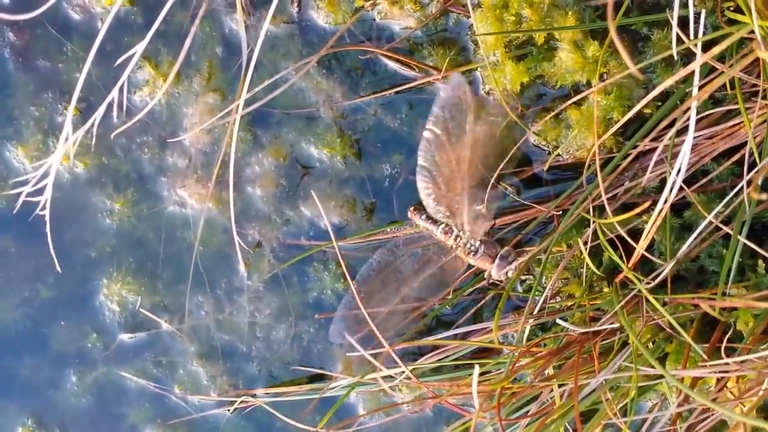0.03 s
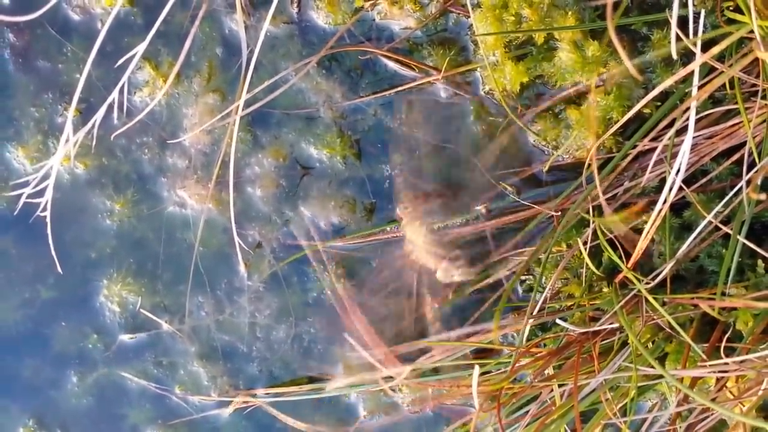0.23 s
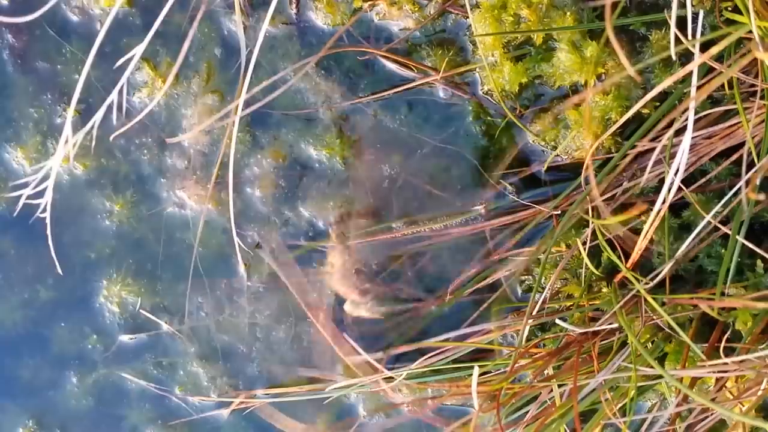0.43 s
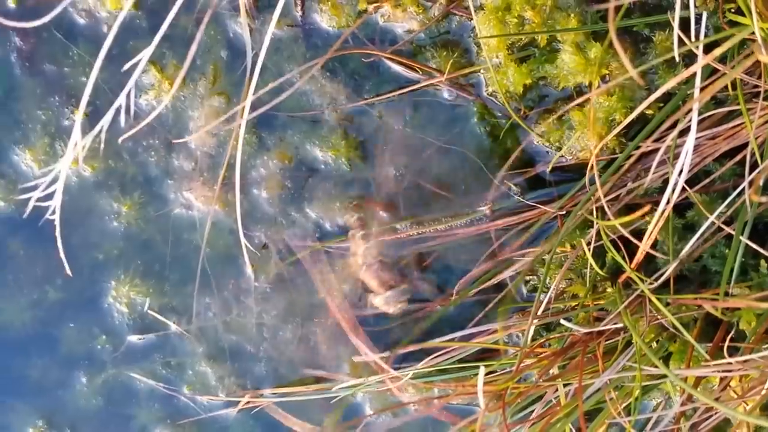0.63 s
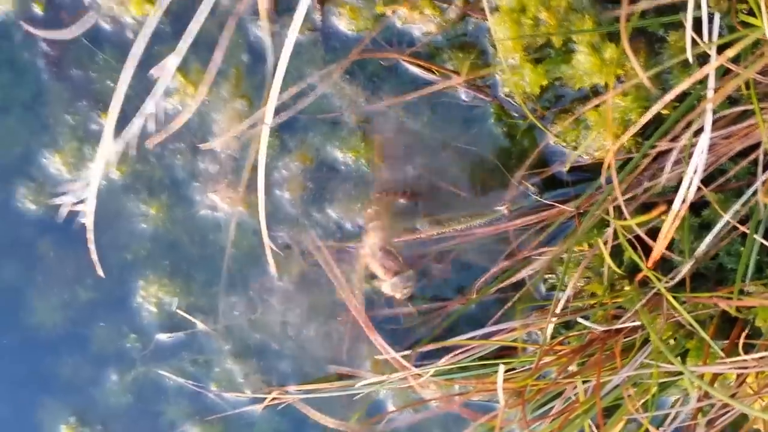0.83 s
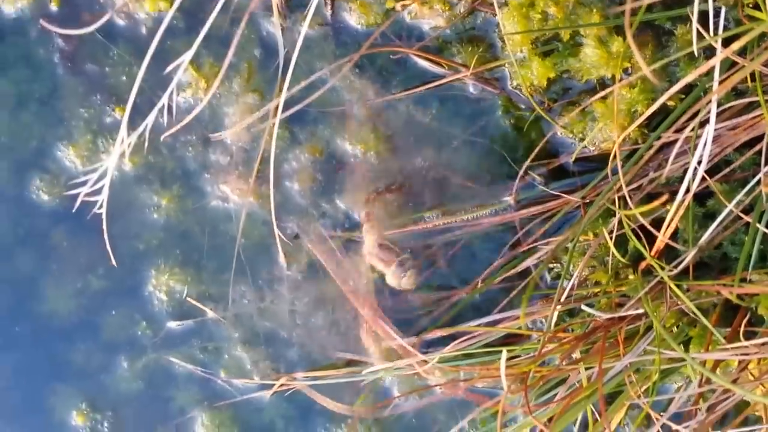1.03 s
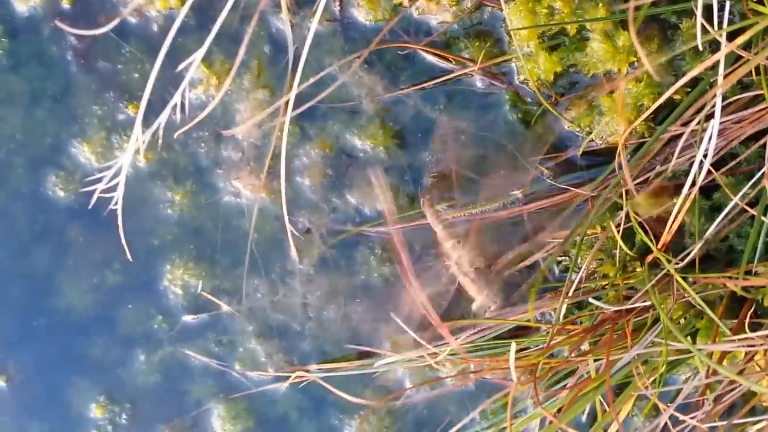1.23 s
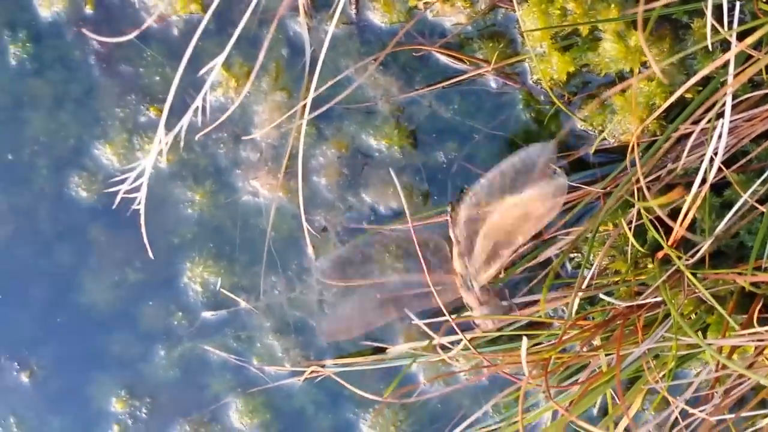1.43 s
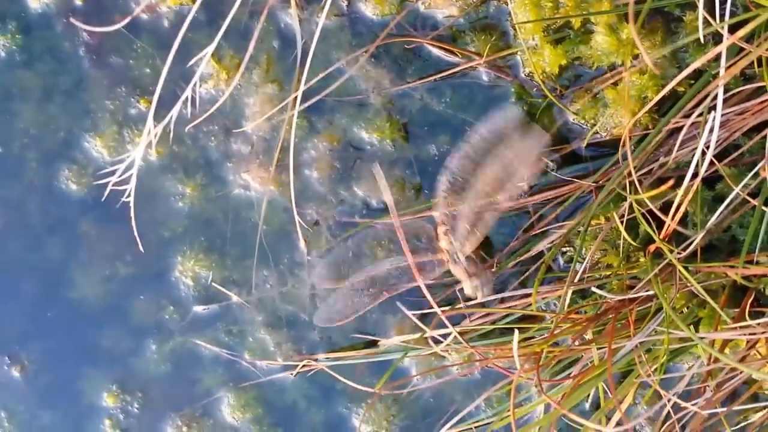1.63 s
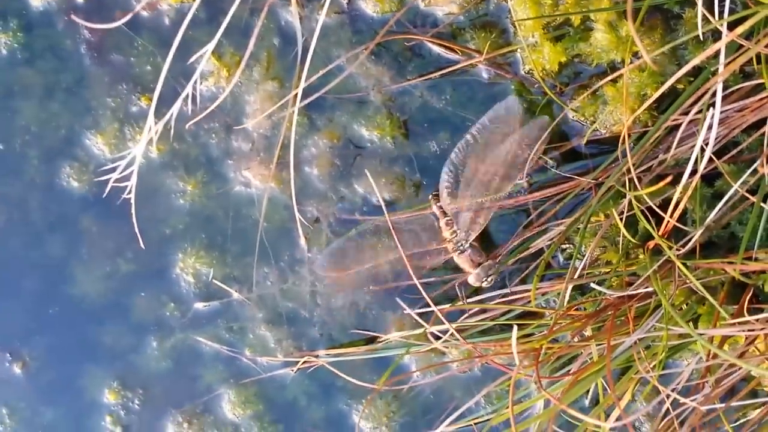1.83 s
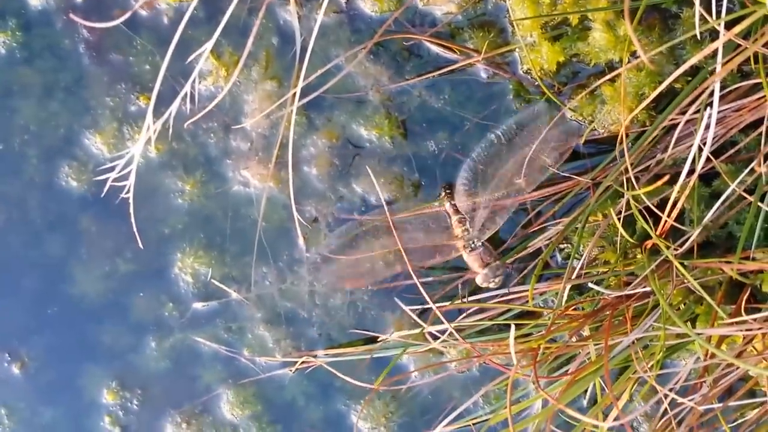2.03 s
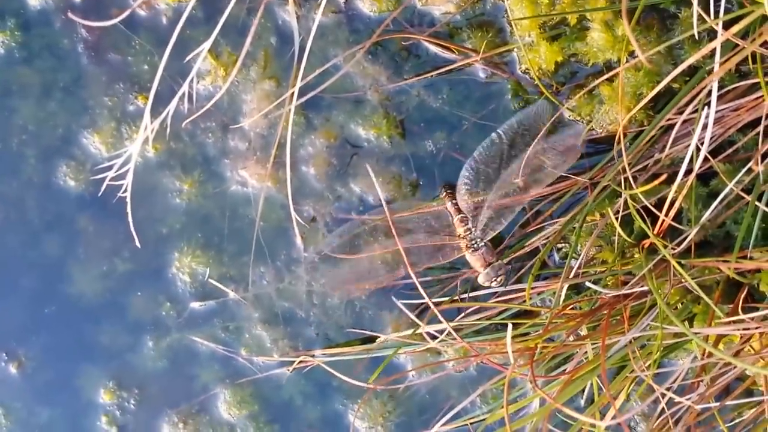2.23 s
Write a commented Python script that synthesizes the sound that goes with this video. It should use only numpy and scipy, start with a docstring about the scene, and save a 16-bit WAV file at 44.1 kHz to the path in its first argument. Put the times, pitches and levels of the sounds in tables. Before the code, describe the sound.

A dragonfly beats its wings against dry grass very close by, a rapid crinkle with sharp snaps over a faint low hum. It then settles, its legs ticking on the stalks in quiet air beside a pond.

```python
"""A soft low bump and a thin scrape, then a dragonfly beats its wings on dry grass by a pond, very close.
Each stroke brushes the stems in a crinkle of tiny clicks; the hardest strokes slap and snap.
Underneath, the air pushed by the wings makes a low hum and a soft rush.
Then it settles: its legs tick on the stalks and the grass rustles faintly in the quiet open air."""
import sys
import numpy as np
from scipy import signal
from scipy.fft import rfft, irfft, next_fast_len
from scipy.io import wavfile

SR = 44100
rng = np.random.default_rng(int(sys.argv[2]) if len(sys.argv) > 2 else 0)


def unload_audio(sound):
    """Save the sound as a 16-bit wav file, at the path given as the first command line argument."""
    columns = np.transpose(np.atleast_2d(sound))
    # keep every value between -1 and 1, then stretch to whole-number steps
    steps = np.round(np.clip(columns, -1, 1) * 32767)
    wavfile.write(sys.argv[1], SR, steps.astype(np.int16))


N = 105840
TIME = np.arange(N) / SR

# how fast the wings beat: t/s, f/Hz
WINGBEAT_RATE = [(0.3, 33.6), (0.48, 33.2), (0.56, 32.0), (0.68, 34.8), (0.85, 34.4), (0.97, 33.0),
                 (1.1, 33.6), (1.22, 32.4), (1.4, 33.4)]
# how hard the wings brush the grass: t/s, level/dB
BRUSH_LEVEL = [(0.11,-71),(0.14,-63.5),(0.2,-59.5),(0.236,-45.5),(0.25,-36.5),(0.318,-30.5),(0.384,-39.5),(0.405,-32),(0.414,-46),(0.425,-30.5),(0.57,-35.5),(0.73,-35.5),(0.84,-31.5),(0.95,-35.5),(1.08,-35.5),(1.2,-35),(1.328,-35),(1.341,-38.5),(1.352,-34.5),(1.395,-40.5),(1.428,-35.5),(1.47,-51),(1.53,-63),(1.66,-74)]
# tone of dry grass at each ear (how strong each frequency is): f/Hz, level/dB
GRASS_TONE_LEFT = [(40,-28),(110,-12),(450,-16.5),(1050,-11),(1400,-2.5),(1800,-2),(2600,-16),(3500,-8),(5600,-2.5),(6000,-9.5),(6650,1),(7400,-5.5),(8100,-2.5),(8500,-12),(8900,-26),(9400,-13),(10400,-7.5),(11600,-20),(14500,-18)]
GRASS_TONE_RIGHT = [(40,-11),(110,-15.5),(450,-29),(700,-23),(1150,-11),(1750,-11),(2900,-9),(4000,-9),(5500,-7),(8000,0),(9500,-0.5),(10400,-3.5),(11700,-2.5),(14500,-6)]
# borders between the crinkle's frequency bands: f/Hz
CRINKLE_EDGES = [1100, 1550, 2300, 3300, 4600, 6200, 8000, 10500]
# wing slaps on the stems: t/s, body level/dB, treble level/dB
WING_SLAPS = [(0.2137,-48,-36),(0.241,-43,-28.5),(.249,-39.5,-28),(0.269,-38,-23.5),(.2735,-30.5,-26),(0.2814,-50,-27),(0.2966,-32,-21),(0.3005,-32,-28),(0.3092,-54,-28),(0.3142,-36,-31),(0.3284,-30,-31),(.332,-49,-31),(0.344,-33,-22.5),(0.3466,-42,-30),(.3577,-29,-20.5),(.3717,-40,-25),(0.375,-33,-32),(0.3894,-32.5,-24),(0.3942,-33.5,-22),(.405,-32.5,-27),(0.419,-36.5,-25.5),(0.4236,-35,-24.5),(0.448,-37,-27),(0.4542,-34,-26),(0.4783,-37.5,-29),(.508,-29.5,-27.5),(0.539,-37.5,-32.5),(.602,-40,-33.5),(0.66,-45,-34),(0.688,-28,-24),(0.7179,-33,-25.5),(0.7478,-38.5,-24),(0.7751,-34.5,-25.5),(0.8039,-31,-22),(0.8326,-28.5,-23.5),(.862,-27,-22.5),(0.8928,-32.5,-24.5),(1.0752,-39,-33.5),(1.101,-35.5,-32),(1.1065,-31.5,-27),(1.1278,-35,-26.5),(1.1374,-36,-36),(1.1774,-47,-31.5),(1.1954,-33,-27.5),(1.229,-27.5,-32),(1.256,-30.5,-23.5),(1.261,-32,-33),(1.2874,-24,-21),(1.2921,-35.5,-29),(1.312,-32.5,-27),(1.319,-31,-27),(1.3705,-37.5,-26.5),(1.3798,-38.5,-25),(1.408,-42,-25.5)]
# snaps of the wing's thin skin: t/s, level/dB, f/Hz
WING_SNAPS = [(.274,-11,8600),(.314,-10.5,7540),(.359,-10.5,11600),(.425,-13,8040),(.717,-15,9400),(.7497,-8,9200),(0.7746,-13.5,9000),(.834,-15.5,8800),(1.130,-21.5,10500),(1.179,-16,11900),(1.289,-16.5,11500)]
# wing hum: t/s, level/dB
HUM_LEVEL = [(0.15,-83),(0.22,-70),(0.38,-69.5),(0.52,-56.5),(0.85,-60),(1.0,-63),(1.28,-62.5),(1.44,-67.5),(1.52,-81.5),(1.64,-76),(1.72,-84.5)]
# notes in the hum: multiple of the wingbeat, level/dB
HUM_NOTES = [(2,2.5),(3,-0.5),(4,-1.5),(5,-8.5),(6,-12)]
# rush of churned air: t/s, level/dB
RUSH_LEVEL = [(0.09,-90),(0.13,-68),(0.22,-69.5),(0.3,-73),(0.6,-51),(0.8,-59.5),(1.1,-53.5),(1.35,-57.5),(1.47,-62),(1.62,-65.5),(1.75,-75),(1.9,-70.5),(2.12,-91.5)]
# its tone: f/Hz, level/dB
RUSH_TONE = [(25,-6),(70,-8),(180,-4),(400,-7),(700,-12.5),(1200,-14.5),(4000,-42.5)]
# a wing edge scraping: t/s, level/dB
SCRAPE_LEVEL = [(0.11,-83.5),(0.135,-54.5),(0.155,-84),(0.18,-45),(0.2,-86),(0.225,-66),(0.26,-90)]
# its tone: f/Hz, level/dB
SCRAPE_TONE = [(2000,-35.5),(7500,-8.5),(9000,-7),(9500,9),(10300,-13),(14500,-34)]
# legs tapping stalks: t/s, left level/dB, right level/dB, blade ring level/dB
LEG_TICKS = [(.133,-50,-54,-63),(0.168,-54,-49,-70),(1.472,-39,-60,-48),(1.511,-46,-48,-55),(1.5417,-58,-52,-39),(1.565,-50,-62,-48),(1.5763,-48.5,-50,-37),(1.5838,-40,-52.5,-39),(1.5929,-52,-62,-37),(1.6046,-54,-64,-41),(1.620,-43,-61,-64),(1.686,-55,-49,-58),(1.751,-50,-47.5,-58),(1.7797,-43,-65,-46),(1.9666,-51,-64,-52),(1.9758,-48.5,-61,-46),(2.005,-60,-68,-45.5),(2.0209,-46.5,-65,-49),(2.238,-50,-69,-52.5),(2.249,-44.5,-63,-50),(2.2819,-51,-68,-45.5)]
# tone of the stalks at the left ear: f/Hz, level/dB
STALK_TONE = [(150,-5.5),(900,-12.5),(1250,-12),(1750,-2.5),(2400,-9),(3400,-3),(4500,-5),(6400,-2),(7000,-7.5),(7700,-22),(10500,-18.5),(14500,-24)]
# faint grass rustles: middle t/s, half length/s, left level/dB, right level/dB
GRASS_RUSTLES = [(1.466,0.026,-49,-72),(1.576,0.043,-54.5,-62.5),(1.69,0.012,-63.5,-59),(1.831,0.032,-59.5,-64.5),(1.998,0.068,-62,-78.5),(2.071,0.011,-74,-57),(2.273,0.047,-64.5,-78)]
# tone of the low bump: f/Hz, level/dB
BUMP_TONE = [(40,-14),(200,5),(700,-6),(1500,-31),(5000,-52)]
# tone of the open air: f/Hz, level/dB
AIR_TONE = [(25,-11.5),(100,-4.5),(267,-6),(430,-9),(697,-15.5),(1070,-13.5),(1720,-15),(2570,-19),(6520,-17.5),(9000,-16.5),(14500,-23.5)]

BODY_EDGE_HZ, CUTOFF_HZ = 4600, 14650   # top of the crinkle's body; top of the whole sound
BODY_SHARED, TREBLE_SHARED = 0.5, 0.056   # share of the power common to both ears
CLUMP_HZ, PATCH_HZ, WAVER_HZ = 176, 25.6, 9   # how fast clicks clump, bands flicker and the hum wavers
RUSTLE_CLICKS_PER_S, RUSTLE_SPREAD_DB = 2500, 4


def brushing(phase):
    """Wings brush the grass: the crinkle swells as each stroke lands and thins as they lift off."""
    level_db = curve(BRUSH_LEVEL) + 1.1 * drift(CLUMP_HZ)
    body = amp(level_db - 1.5 + 2 * np.cos(phase))
    treble = amp(level_db - 3 + 1.16 * np.cos(phase))
    return crinkle(body, treble, per_s=5000, spread_db=5, flicker_db=3.22)


def wing_phase(landing_s=0.693):
    """Angle of the wingbeat: one turn per stroke, zero for the stroke that lands at landing_s."""
    turns = np.cumsum(curve(WINGBEAT_RATE)) / SR
    return 2 * np.pi * (turns - np.interp(landing_s, TIME, turns))


def crinkle(body, treble, per_s, spread_db, flicker_db):
    """Stems give the lower body, the wing's skin the treble; the tone shifts from touch to touch."""
    stems = body * crackle(per_s, spread_db, BODY_SHARED)
    skin = treble * crackle(per_s, spread_db, TREBLE_SHARED)
    out = 0
    for low, high in zip([20] + CRINKLE_EDGES, CRINKLE_EDGES + [18000]):
        band = signal.butter(2, [low, high], "band", fs=SR, output="sos")
        source = stems if high <= BODY_EDGE_HZ else skin
        flicker = amp(flicker_db * drift(PATCH_HZ))
        out = signal.sosfilt(band, source + 1e-18) * flicker - out   # flipping signs joins the bands
    return colour(out, GRASS_TONE_LEFT, GRASS_TONE_RIGHT)


def slaps():
    """A wing hits a stem squarely and makes a short, dense burst of clicks."""
    starts, body_db, treble_db = np.transpose(WING_SLAPS)
    shapes = np.array([burst(t, attack_s=0.00049, hold_s=0.00097, decay_s=0.0023) for t in starts])
    body = amp(body_db + 7.5) @ shapes
    treble = amp(treble_db - 0.12) @ shapes
    return crinkle(body, treble, per_s=8000, spread_db=1.5, flicker_db=1.9)


def snaps(width_s=0.00044, left_db=-23):
    """The wing's skin buckles and rings for a few cycles, off to the right."""
    out = 0
    for t, db, hz in WING_SNAPS:
        age = TIME - t
        out += amp(db) * np.exp(-(age / width_s) ** 2) * np.sin(2 * np.pi * hz * age)
    return np.array([amp(left_db) * out, out])


def hum(phase, waver_rad=0.35, waver_db=1.5):
    """The wings push the air, making low, wavering notes at multiples of the beat."""
    out = 0
    for multiple, db in HUM_NOTES:
        offset = rng.uniform(0, 2 * np.pi) + waver_rad * np.array([drift(WAVER_HZ), drift(WAVER_HZ)])
        out += amp(db + waver_db * drift(WAVER_HZ)) * np.sin(multiple * phase + offset)
    return amp(curve(HUM_LEVEL)) * out


def rush():
    """Air churned by the wings makes a soft, low noise."""
    noise = two_ears(rng.standard_normal((3, N)), shared=0.3)
    return amp(curve(RUSH_LEVEL)) * colour(noise, RUSH_TONE)


def scrape(left_db=-13):
    """A wing edge slides along a blade of grass before the flutter starts."""
    clicks = amp(curve(SCRAPE_LEVEL)) * crackle(RUSTLE_CLICKS_PER_S, RUSTLE_SPREAD_DB, TREBLE_SHARED)
    return amp([[left_db], [0]]) * colour(clicks, SCRAPE_TONE)


def blade_rings(pitch_hz=6230, decay_s=0.00067):
    """Each leg tick sets a blade ringing briefly, at a slightly different pitch."""
    out = 0
    for t, _, _, db in LEG_TICKS:
        hz = pitch_hz * (1 + 0.044 * rng.standard_normal())
        out += amp(db + 4) * burst(t, decay_s / 2, decay_s) * np.sin(2 * np.pi * hz * (TIME - t))
    return out


def leg_ticks(decay_s=0.0012):
    """Legs tap the stalks, each tap a tiny burst of noise."""
    taps = sum(amp([[left], [right]]) * burst(t, decay_s / 10, decay_s)
               for t, left, right, _ in LEG_TICKS)
    return amp(2.5) * taps * rng.standard_normal((2, N))


def rustles(clump_db=3.5):
    """The grass stirs in faint swells of clumped clicks."""
    swells = sum(amp([[left], [right]]) * np.exp(-((TIME - t) / half) ** 2 / 2)
                 for t, half, left, right in GRASS_RUSTLES)
    clumps = amp(clump_db * drift(CLUMP_HZ))
    return swells * clumps * crackle(RUSTLE_CLICKS_PER_S, RUSTLE_SPREAD_DB, TREBLE_SHARED)


def settling():
    """The dragonfly settles: ticks and rustles take on the grass's tone; blades ring on the left."""
    rings = blade_rings()
    clicks = rustles() + leg_ticks()
    left = colour(clicks[:1], STALK_TONE) + rings
    right = colour(clicks[1:], GRASS_TONE_RIGHT)
    return np.vstack([left, right])


def bump(start_s=0.031):
    """One soft, low bump before the flutter."""
    knock = burst(start_s, attack_s=0.00039, decay_s=0.0039) * rng.standard_normal((1, N))
    return amp(-53) * colour(knock, BUMP_TONE)


def open_air():
    """The steady, quiet hiss of the outdoors."""
    noise = two_ears(rng.standard_normal((3, N)), shared=0.43)
    return amp(-69) * colour(noise, AIR_TONE)


def amp(db):
    """Turn decibels into a number to multiply by."""
    return 10 ** (np.asarray(db) / 20)


def unit_power(x):
    """Scale a signal to an average power of one."""
    return x / np.sqrt(np.mean(x ** 2) + 1e-20)


def curve(rows):
    """Join (time, value) points with straight lines."""
    return np.interp(TIME, *np.transpose(rows))


def drift(hz):
    """A smooth random wander of typical size one; more hz makes it faster."""
    pole = np.exp(-2 * np.pi * hz / SR)
    noise = rng.standard_normal(N + SR // 4)
    return unit_power(signal.lfilter([1], [1, -2 * pole, pole * pole], noise)[-N:])


def burst(start_s, attack_s, decay_s, hold_s=0):
    """A loudness shape that rises, holds and dies away."""
    out = np.zeros(N)
    span = slice(int(start_s * SR), int(start_s * SR) + 4096)
    age = TIME[span] - start_s
    out[span] = np.clip(age / attack_s, 0, 1) * np.exp(-np.maximum(age - attack_s - hold_s, 0) / decay_s)
    return out


def crackle(per_s, spread_db, shared):
    """Tiny random clicks of uneven size at both ears."""
    sizes = amp(spread_db * np.minimum(rng.exponential(1, (3, N)), 4))
    signs = rng.choice([-1, 1], (3, N))
    hits = rng.random((3, N)) < per_s / SR
    return two_ears(unit_power(sizes * signs * hits), shared)


def two_ears(three, shared, lag_s=0.00036):
    """The first of three signals reaches both ears, the right one later; the others go one to each."""
    direct = np.array([three[0], np.roll(three[0], round(lag_s * SR))])
    return np.sqrt(shared) * direct + np.sqrt(1 - shared) * three[1:]


def colour(x, *tones, size=4096):
    """Filter a sound by one tone table, or one per ear, with an average power gain of one."""
    hz = np.maximum(np.fft.rfftfreq(size, 1 / SR), 1)
    gain = amp([np.interp(np.log(hz), np.log(f), db) for f, db in map(np.transpose, tones)])
    gain /= np.sqrt(np.mean(gain ** 2 * (hz < CUTOFF_HZ)))
    # folding makes the filter ring after a click, never before it
    fold = np.r_[1, np.full(size // 2 - 1, 2), 1, np.zeros(size // 2 - 1)]
    response = irfft(np.exp(rfft(irfft(np.log(gain)) * fold)))
    length = next_fast_len(N + size, True)
    return irfft(rfft(x, length) * rfft(response, length), length)[:, :N]


def scene():
    """The flutter, the settling and the air around them."""
    phase = wing_phase()
    wings = scrape() + brushing(phase) + slaps() + snaps() + hum(phase) + rush()
    return wings + settling() + open_air() + bump()


def record(dry):
    """Cut off the highest treble steeply."""
    return signal.sosfilt(signal.ellip(10, .2, 70, CUTOFF_HZ, fs=SR, output="sos"), dry)


dry = scene()
out = record(dry)
unload_audio(out)
```